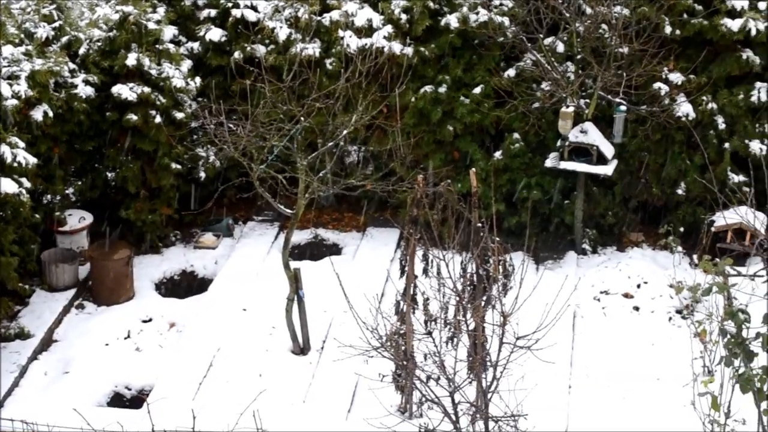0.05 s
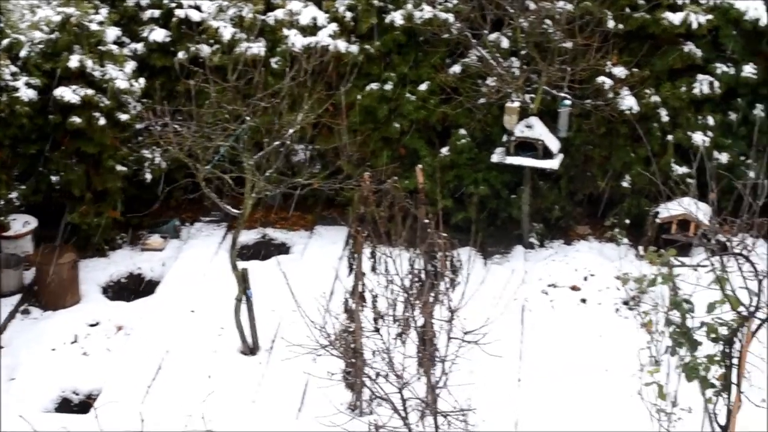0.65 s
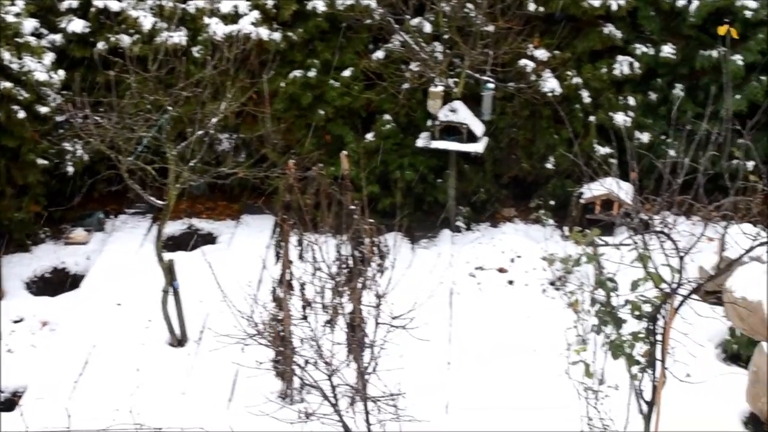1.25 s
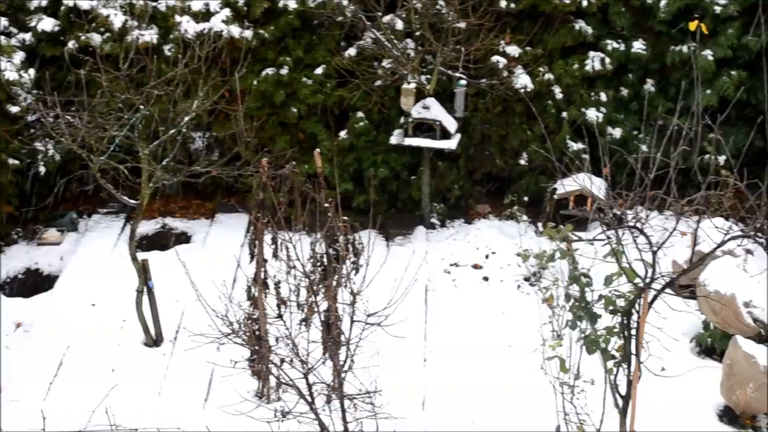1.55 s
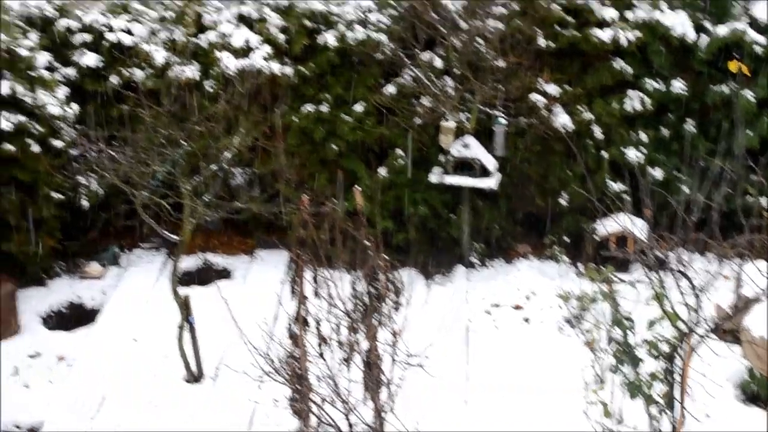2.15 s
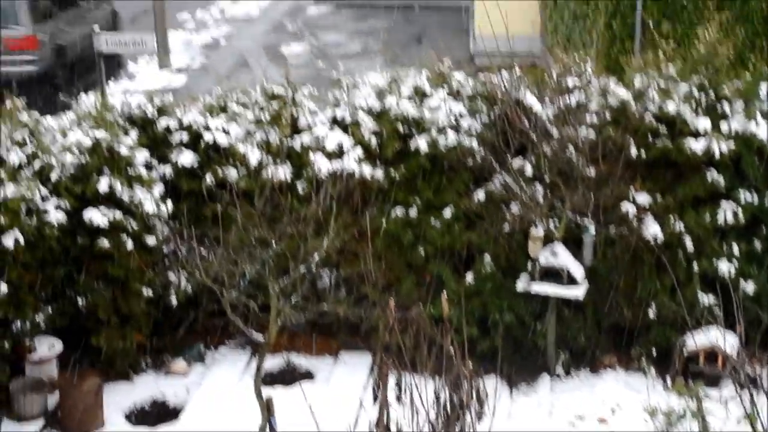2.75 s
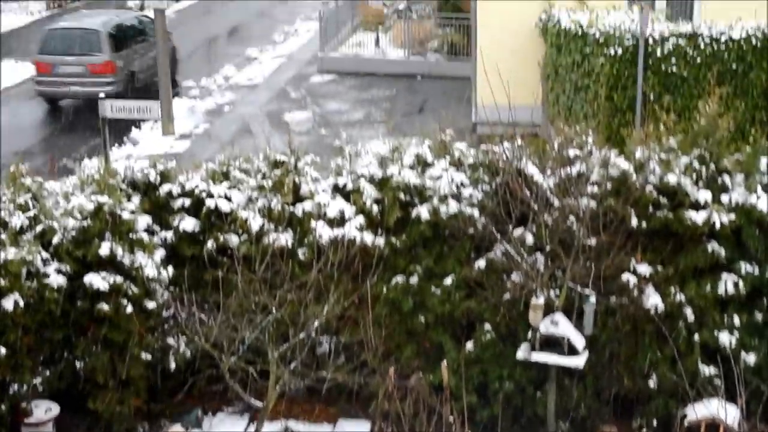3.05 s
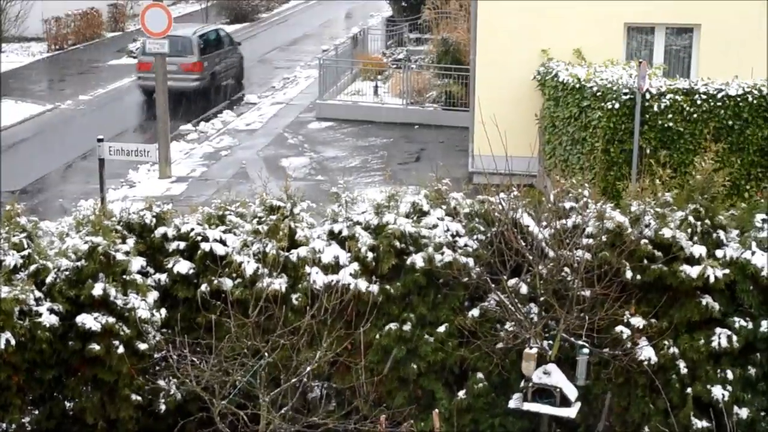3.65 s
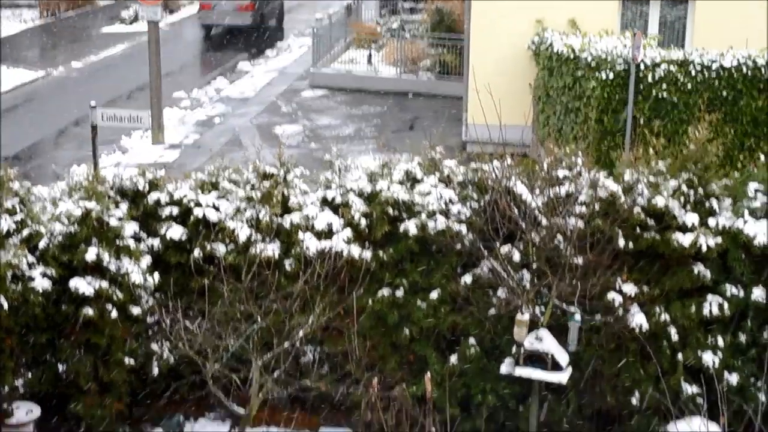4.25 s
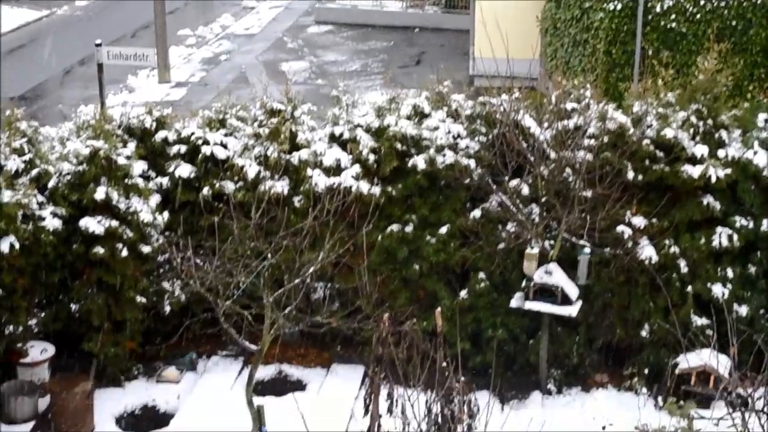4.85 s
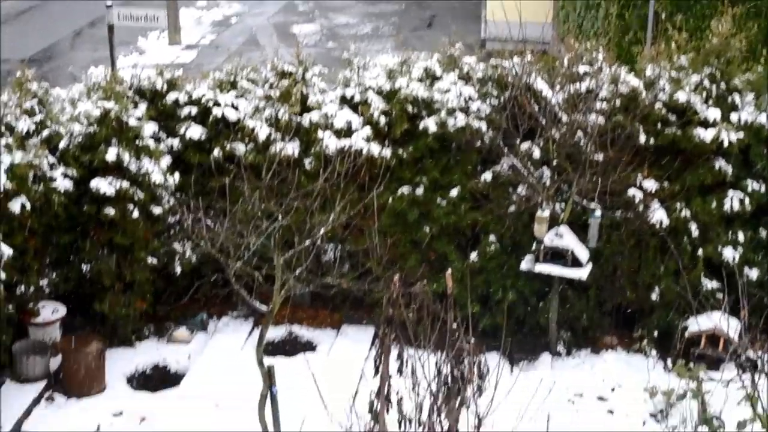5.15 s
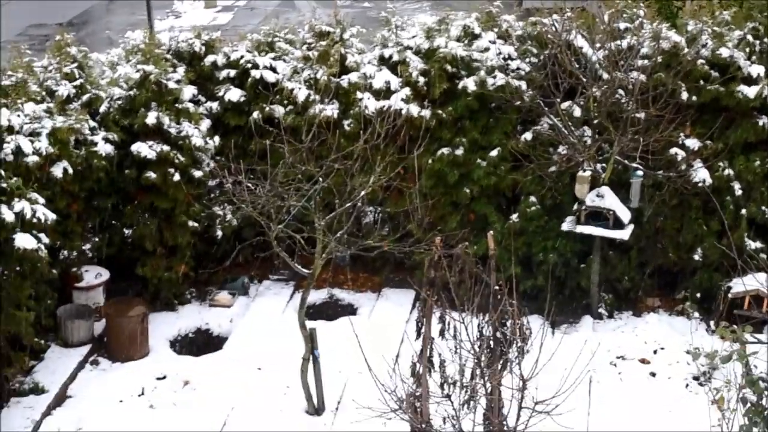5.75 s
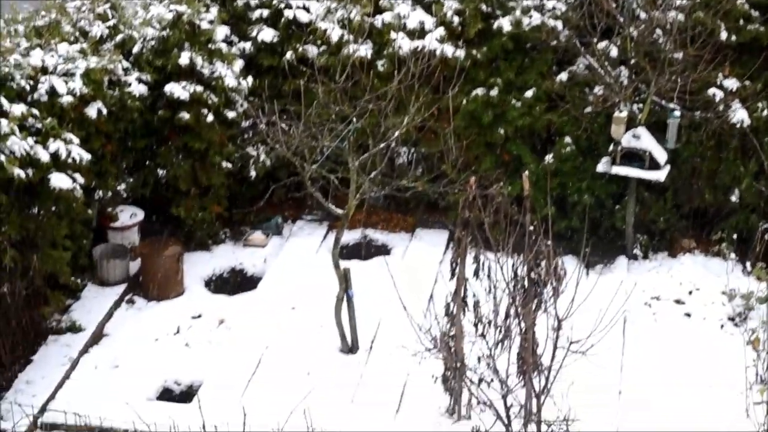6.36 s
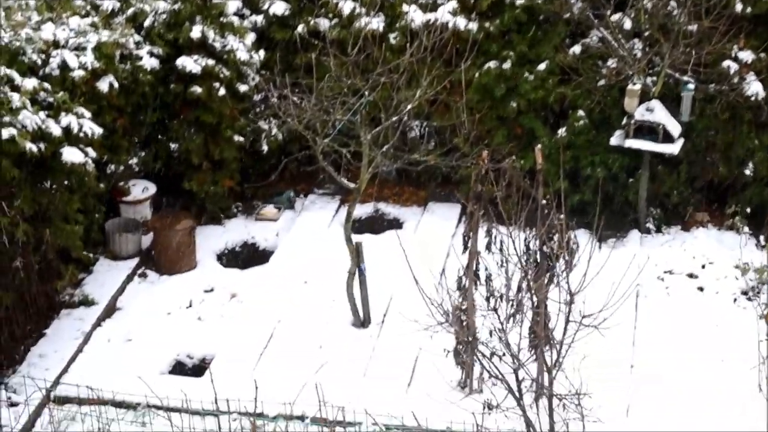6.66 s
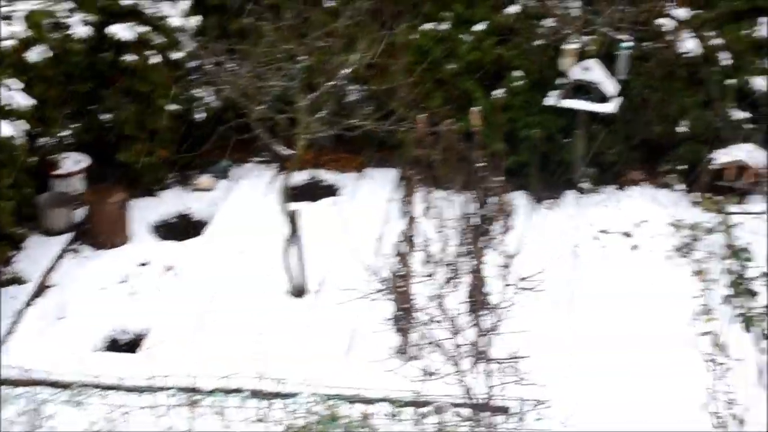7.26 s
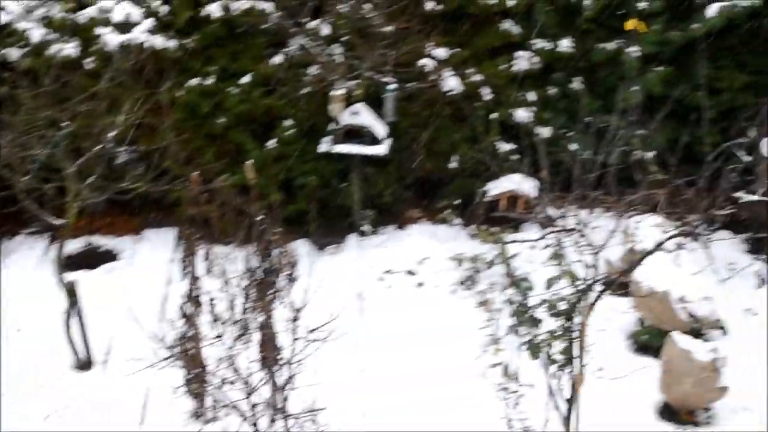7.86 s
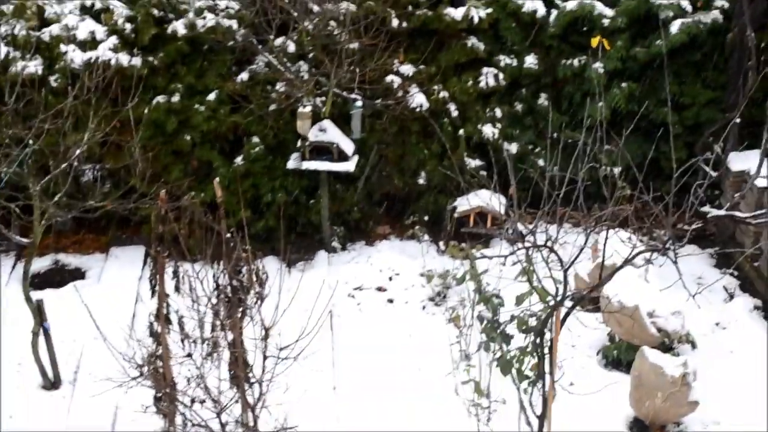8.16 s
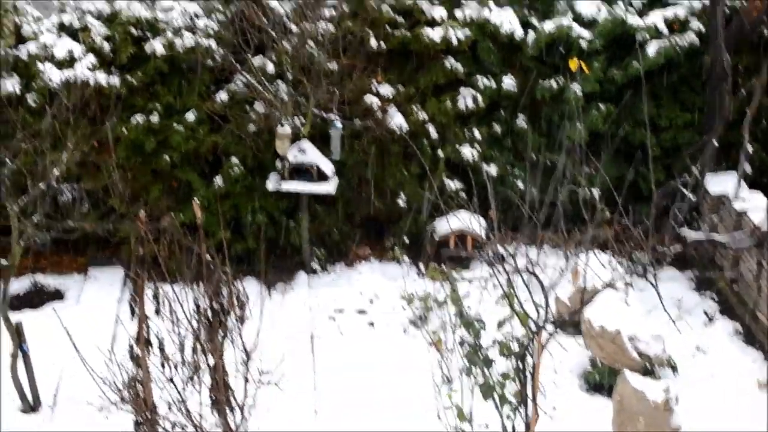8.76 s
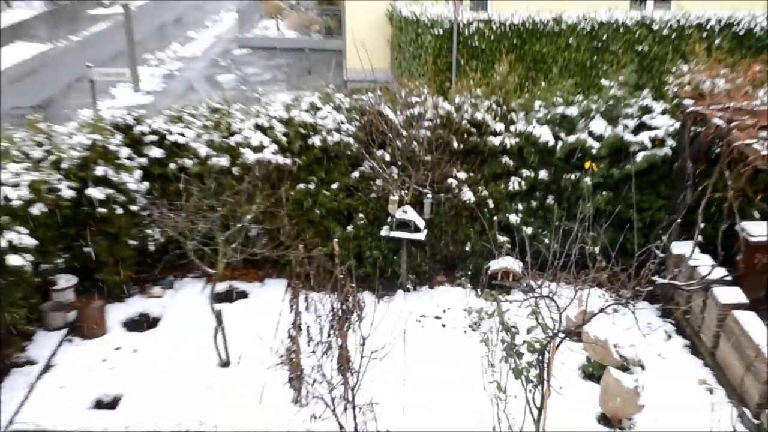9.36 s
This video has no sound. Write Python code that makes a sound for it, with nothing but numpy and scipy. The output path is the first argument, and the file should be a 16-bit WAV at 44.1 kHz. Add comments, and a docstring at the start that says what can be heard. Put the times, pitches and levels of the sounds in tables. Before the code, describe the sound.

Wet tyre hiss swells and slowly fades as a car drives by outdoors through slush, its engine humming quietly underneath.

```python
"""A car passing on a slushy street

A car drives past a snowy garden, changes up a gear and rolls away behind a house. Its tyres roar
and ring on the wet road, throw hissing spray and now and then splat through slush. Under them
hums a soft four-cylinder engine, whose notes follow how fast it fires. Far traffic murmurs, and
near the end a drop of meltwater taps close to the one microphone above the hedge."""
import sys
import numpy as np
from scipy import signal
from scipy.fft import rfft, irfft
from scipy.io import wavfile
from scipy.ndimage import uniform_filter1d

SR = 44100
rng = np.random.default_rng(int(sys.argv[2]) if len(sys.argv) > 2 else 0)


def output_pcm(signal):
    """Save a mono or channel-first signal as 16-bit PCM at the path in sys.argv[1].

    Samples are clipped to [-1, 1] before scaling.
    """
    pcm = np.clip(np.atleast_2d(signal).T, -1, 1) * 32767
    wavfile.write(sys.argv[1], SR, np.round(pcm).astype(np.int16))


N = 418950   # 9.5 seconds
TIME = np.arange(N) / SR
FREQS = np.maximum(np.arange(N // 2 + 1) * SR / N, 1)


def from_db(db):
    """Turn decibels into a number to multiply a sound by."""
    return 10 ** (np.asarray(db) / 20)


def rms_one(x):
    """Scale a sound so that its average level (rms) is 1."""
    return x / np.sqrt(np.mean(x ** 2) + 1e-20)


def evened(x):
    """Hold the level near 1 over each quarter second, keeping the fast grain."""
    power = np.maximum(uniform_filter1d(x * x, SR // 4), 0)
    return x / np.sqrt(power + 1e-20)


def in_time(rows):
    """Join rows that start with a time into one curve for each further column."""
    times_s, *columns = np.transpose(rows)
    return [np.interp(TIME, times_s, column) for column in columns]


def hump(peak_s, half_length_s):
    """A smooth rise and fall in time, 1 at its top."""
    return np.exp(-.5 * ((TIME - peak_s) / half_length_s) ** 2)


def bell(hz, centre_hz, width_hz):
    """The shape of a resonance: 1 at its centre, less to either side."""
    return 1 / (1 + (2 * (hz - centre_hz) / width_hz) ** 2)


def colour(points):
    """Join a few (pitch_hz, relative_db) points into a gain for every frequency."""
    hz, db = np.transpose(points)
    return from_db(np.interp(np.log(FREQS), np.log(hz), db))


def band(low_hz, high_hz, order=32):
    """Gains that keep what lies between two pitches; a higher order makes steeper edges."""
    return 1 / ((1 + (low_hz / FREQS) ** order) * (1 + (FREQS / high_hz) ** order))


def filtered(x, gain):
    """Turn each frequency of a sound up or down by its gain."""
    return irfft(rfft(x) * gain, N)


def noise(gain):
    """Steady noise of a given colour, at level 1."""
    spectrum = rng.standard_normal(len(FREQS)) + 1j * rng.standard_normal(len(FREQS))
    return rms_one(irfft(gain * spectrum, N))


def drift(rate_hz):
    """A smooth random wander, about 1 in size; a higher rate wanders faster."""
    step, settle = 40, 2000   # one value every 40 samples; the first 2000 values are skipped
    pole = np.exp(-2 * np.pi * rate_hz * step / SR)
    jitter = rng.standard_normal(N // step + settle + 2)
    slow = signal.lfilter([1], [1, -2 * pole, pole * pole], jitter)[settle:]
    return np.interp(np.arange(N) / step, np.arange(len(slow)), rms_one(slow))


def swelling(x, rows):
    """Make bands of a sound swell or sink for a while, each around its own moment."""
    out, spectrum = x.copy(), rfft(x)
    for peak_s, half_length_s, pitch_hz, width_hz, change_db in rows:
        part = irfft(spectrum * bell(FREQS, pitch_hz, width_hz), N)
        out += (from_db(change_db * hump(peak_s, half_length_s)) - 1) * part
    return out


def doublings(nearest_s, speed_m_per_s=9.85, road_distance_m=9.92):
    """How many doublings farther away the car is than at its nearest point."""
    along_road_m = speed_m_per_s * (TIME - nearest_s)
    return np.log2(np.hypot(1, along_road_m / road_distance_m))


# The colours of the town's rumble and of tyres far away: pitch_hz, relative_db
TOWN_COLOUR = [(25, -24), (50, -10), (85, -8), (140, 0), (200, 0), (300, -4), (600, -9), (2000, -52)]
FAR_TYRE_COLOUR = [(210, -45), (350, -7), (397, -4), (433, 4), (503, -9), (529, -10), (800, 1.5),
                   (1030, -2), (1360, 0.5), (1660, 2), (2080, -1), (2320, -1), (2770, -1.5), (4570, -2.5),
                   (7000, -12.5), (9100, -13), (15400, -120)]

def town(rumble_db=-66.0, hiss_db=-56.5):
    """Far traffic on wet roads leaves a faint rumble and hiss."""
    rumble = noise(colour(TOWN_COLOUR))
    hiss = noise(colour(FAR_TYRE_COLOUR) * band(2600, 7000, order=8))
    return from_db(rumble_db) * rumble + from_db(hiss_db) * hiss


# The notes in the drop's tap, each dying by 60 dB in its ring time: pitch_hz, relative_db, ring_s
DRIP_NOTES = [(660, -33, .03), (800, -37, 0.023), (1080, -34, 0.018), (1400, -45, 0.011)]

def drip(start_s=8.8205, gain_db=-0.5, low_cut_hz=520):
    """A drop of meltwater lands with a hollow tap; neighbouring notes swing in opposite directions."""
    age = np.clip(TIME - start_s, 0, .5)
    tap = 0
    for k, (pitch_hz, relative_db, ring_s) in enumerate(DRIP_NOTES):
        level = from_db(relative_db + gain_db - 60 * age / ring_s)
        tap += (-1) ** k * level * np.sin(2 * np.pi * pitch_hz * age)
    return signal.sosfilt(signal.butter(2, low_cut_hz, "high", fs=SR, output="sos"), tap)


# Hums set off by bumps: peak_s, half_length_s, pitch_hz, level_db
BUMP_HUMS = [(.55, 0.098, 177.4, -56), (1.05, 0.11, 175, -55), (3.488, 0.095, 174, -59.5),
             (3.843, 0.049, 170, -64), (4.07, 0.051, 173, -63), (8.57, 0.06, 172, -68),
             (8.97, .09, 173, -67)]

def tyre_air(wobble=0.016, rough_db=3.0):
    """The ring of air inside the tyres hums unsteadily after a bump."""
    flutter = from_db(rough_db * drift(16))
    wavering_time = np.cumsum(1 + wobble * drift(5.0)) / SR
    hums = sum(from_db(level_db) * hump(peak_s, half_s) * np.sin(2 * np.pi * pitch_hz * wavering_time)
               for peak_s, half_s, pitch_hz, level_db in BUMP_HUMS)
    return np.sqrt(2) * flutter * hums


# How hard the engine works: time_s, load_db
ENGINE_LOAD = [(0, 2.5), (.8, 4.5), (1.2, 10), (1.45, 6.5), (1.72, 7), (1.82, -0.5), (2.25, -3.5),
               (2.42, 5), (2.93, 3.5), (3.06, -6), (3.3, -11), (3.6, -11.5), (4.25, -11), (4.8, -4),
               (5.5, -1), (6.05, -11), (6.45, 1), (7.85, 4.5), (8.05, -7), (8.5, -2), (9.5, -5)]

def under_load(nearest_s, level_db, loss_db, load_share):
    """An engine sound's level in dB: it follows the load and drops by loss_db as distance doubles."""
    load_db, = in_time(ENGINE_LOAD)
    return level_db - loss_db * doublings(nearest_s) + load_share * load_db


# The engine pulls in a low gear, changes up after three seconds, then eases off: time_s, firing_hz
FIRING_RATE = [(0, 66.5), (.35, 63), (.69, 60.4), (.91, 61.4), (1.2, 61.7), (1.4, 63.5), (1.7, 66.8),
               (2.13, 70.8), (2.4, 73.8), (2.65, 77.2), (2.9, 79), (3.05, 77.3), (3.2, 73), (3.35, 61),
               (3.6, 48), (4.8, 51), (5.5, 51.5), (6.7, 49.7), (7.2, 48), (8.4, 44.3), (9.5, 44.3)]
# Notes at 1 to 5 times the firing rate, a belt-driven part, and the growl of uneven burning:
# nearest_s, level_db, loss_db, load_share
ENGINE_NOTES = [(1.7, -60, 8.7, 0.17), (2.87, -58.5, 7.6, .9), (2.77, -53.7, 13.5, 1.1),
                (1.96, -61.5, 6.2, 0.75), (2.1, -59, 10, 0.48)]
BELT_NOTE = (3, -59, 32, 1)
GROWL_LEVEL = (0.5, -57, 8.5, 1.1)
# Single notes fade or swell as the car goes by: peak_s, half_length_s, firing_multiple, change_db
NOTE_SWELLS = [(1.45, .24, 1, -12), (2.85, .11, 1, -9), (3.22, .12, 1, 6), (8.4, .5, 1, 3),
               (1.1, .3, 2, -8), (6.6, .25, 4, 4.5)]
# The colour of the growl: pitch_hz, relative_db
GROWL_COLOUR = [(30, -42), (70, 2), (105, -12), (135, -9), (180, 13), (250, 4.5), (290, 5.5), (340, -14),
                (420, -31), (1200, -75)]

def engine(wobble=0.0014, rough_db=0.4, belt_multiple=2.26, boom_db=8, throb_hz=2.77, throb_s=5.0):
    """The firings make notes that boom at the exhaust's resonance; uneven burning adds a growl."""
    firing_hz, = in_time(FIRING_RATE)
    phase = 2 * np.pi * np.cumsum(firing_hz * (1 + wobble * drift(4.54))) / SR
    throb = 0.81 * hump(throb_s, 0.7) * np.cos(2 * np.pi * throb_hz * (TIME - throb_s))
    hum = 0
    for multiple, note in [*enumerate(ENGINE_NOTES, 1), (belt_multiple, BELT_NOTE)]:
        exhaust_db = boom_db * bell(multiple * firing_hz, centre_hz=187, width_hz=28)
        level_db = under_load(*note) + exhaust_db + rough_db * drift(7.5)
        if multiple == 1:   # the lowest note throbs as the new gear takes up
            level_db += 20 * np.log10(1 + throb)
        level_db += sum(change_db * hump(peak_s, half_s)
                        for peak_s, half_s, which, change_db in NOTE_SWELLS if which == multiple)
        hum += from_db(level_db) * np.sin(multiple * phase + rng.uniform(0, 2 * np.pi))
    # Labouring at low revs: a side note beats against the fourth note once every four firings.
    load_db, = in_time(ENGINE_LOAD)
    hum += from_db(load_db - 70) * hump(peak_s=7.5, half_length_s=.55) * np.sin(3.75 * phase)
    growl = from_db(under_load(*GROWL_LEVEL)) * noise(colour(GROWL_COLOUR))
    return np.sqrt(2) * hum + growl


# The tyres hit lumps of slush: start_s, relative_db, decay_s
SLUSH_HITS = [(1.408, -32, 0.0088), (2.241, -26, 0.0087), (2.272, -24.5, 0.031), (2.575, -23.5, 0.005),
              (3.14, -37, 0.036), (3.932, -31, .006), (4.071, -30, 0.011), (4.745, -38, .007),
              (6.27, -37, 0.11), (7.4, -39, .45), (7.629, -35.5, 0.011), (9.06, -40, .09)]
# The colour of a splat: pitch_hz, relative_db
SLUSH_COLOUR = [(150, -45), (400, -15), (900, -4), (1800, 5.5), (2600, 0.5), (4000, -9), (9000, -34),
                (11500, -55)]

def slush(gain_db=-2.0, rise_share=0.23):
    """Lumps of slush burst under a tyre in puffs of noise; the longer the puff, the softer its start."""
    bursts = np.zeros(N)
    for start_s, relative_db, decay_s in SLUSH_HITS:
        progress = np.maximum(TIME - start_s, 0) / decay_s
        rise = 1 - np.exp(-progress / rise_share)
        bursts += from_db(relative_db + gain_db) * rise * np.exp(-progress)
    return bursts * noise(colour(SLUSH_COLOUR))


def street_echoes(x, count=16, strength=.046):
    """Faint echoes off kerb, hedge and walls slide and flicker, so the hiss ripples as the car moves."""
    out, farness = x.copy(), doublings(nearest_s=1.84)
    for delay_ms, slide_ms in rng.uniform([1, -.4], [11, .4], (count, 2)):
        late_s = (delay_ms + slide_ms * farness) / 1000
        out += strength * drift(.7) * np.interp(TIME - late_s, TIME, x)
    return out


# Echoes off nearby surfaces shift as car and microphone turn. One list a path: time_s, delay_ms, gain
ECHO_PATHS = [
    [(0, 1.43, 0.12), (.8, 0.82, 0.056), (1.3, 1, 0.063), (1.8, 0.97, 0.12), (2.4, 1.03, 0.061),
     (2.7, 1.4, .03), (3.2, 0.91, 0.081), (4.6, 1.4, 0.037), (5.7, 1.32, 0.13), (7.2, 1.28, 0.23),
     (8.0, 1.14, 0.022), (9.5, 1.4, 0.028)],
    [(0, 2.6, .01), (1, 2.4, .05), (2.1, 2.22, 0.1), (3.5, 2.4, 0.062), (4.4, 1.6, .01)],
    [(0, 2.8, 0.0092), (1.1, 3.34, -0.23), (2, 2.83, -0.031), (3.1, 2.25, -0.002), (3.8, 2.8, 0.014)],
]

def near_echoes(x):
    """Very short echoes lift some pitches and weaken others, in wide ridges that slide up and down."""
    out = x.copy()
    for path in ECHO_PATHS:
        delay_ms, gain = in_time(path)
        out += gain * np.interp(TIME - delay_ms / 1000, TIME, x)
    return out


# The colour of the tyres from the car's front, side and rear: pitch_hz, relative_db
FRONT_COLOUR = [(210, -43), (350, -13), (402, -13), (523, -4), (639, -6.5), (831, -1), (1320, -9),
                (1460, -6.5), (1700, -8.5), (2290, -12), (2600, -11.5), (3060, -15.5), (3450, -14),
                (3860, -14), (7000, -16.5), (9100, -64), (15400, -120)]
SIDE_COLOUR = [(210, -37), (350, 3), (407, -19), (550, 1.5), (663, -8.5), (885, 1.5), (1140, 0), (1410, -2),
               (1540, -5.5), (1720, -4), (2500, -8.5), (2800, -8), (3470, -6.5), (4990, -7.5),
               (7000, -11.5), (9100, -8), (15400, -120)]
REAR_COLOUR = [(210, -39), (350, 9), (412, -27), (536, -6), (600, -6.5), (663, -14), (733, -6), (821, -3),
               (1200, -5), (1590, -3.5), (1970, -10.5), (2410, -6), (3510, -6.5), (3840, -6), (7000, -14),
               (9100, -3), (15400, -120)]
# When each is heard: front_until_s, side_from_s, side_until_s, rear_from_s, rear_until_s, far_from_s
FACING_TIMES = [.7, 1.9, 2.9, 3.6, 5.9, 7.2]

def tyre_noise():
    """Each side of the car has its own colour of noise; they fade into each other as it goes by."""
    facing = np.interp(TIME, FACING_TIMES, [0, 1, 1, 2, 2, 3])
    out = 0
    for k, side in enumerate([FRONT_COLOUR, SIDE_COLOUR, REAR_COLOUR, FAR_TYRE_COLOUR]):
        share = np.maximum(1 - np.abs(facing - k), 0)
        out += np.sqrt(share) * noise(colour(side))
    return out


# Water lying on the road under the wheels: time_s, wetness_db
ROAD_WETNESS = [(0.0, -0.3), (0.5, 0.4), (0.99, 1.5), (1.94, -0.5), (2.15, -3), (2.33, -1), (2.5, -0.6),
                (2.7, -1), (3.17, -.5), (3.28, -1), (3.42, -1), (4.27, 1.4), (4.6, -0.5), (5.25, 2.5),
                (5.65, 3), (6.32, 1.5), (6.6, 0.6), (6.89, 2.1), (7.08, 0.5), (7.67, 1), (7.82, 1),
                (8.38, -0.25), (9.5, -5)]

def passing(nearest_s, level_db, coming_db, going_db, wet_share, house_loss_db, puddle_lift_db):
    """A tyre sound's level in dB: each doubling of distance costs coming_db before, going_db after."""
    house_s, house_fade_s = 5.45, 0.45   # the car slips behind a house
    puddle_s, rise_s, decay_s = 8.972, .035, 1.0   # and later runs through a puddle
    wetness_db, = in_time(ROAD_WETNESS)
    loss_db = np.where(TIME < nearest_s, coming_db, going_db) * doublings(nearest_s)
    hidden = np.clip((TIME - house_s) / house_fade_s, 0, 1)
    age = np.maximum(TIME - puddle_s, 0)
    puddle = np.minimum(age / rise_s, np.exp((rise_s - age) / decay_s))
    return level_db - loss_db + wet_share * wetness_db - house_loss_db * hidden + puddle_lift_db * puddle


def droplets(gain, per_s, spread_db):
    """Countless tiny drops of uneven size land at random moments; the patter has level 1."""
    sizes = from_db(spread_db * np.minimum(rng.exponential(1, N), 4))
    signs = rng.choice([-1, 1], N)
    lands = rng.random(N) < per_s / SR
    return rms_one(filtered(sizes * signs * lands, gain))


def in_sheets(x, waver_db=0.75, rate_hz=3.6, bands=9):
    """The spray comes in sheets, so each band of the hiss wavers on its own."""
    out, spectrum = x.copy(), rfft(x)
    edges_hz = np.geomspace(3000, 11000, bands + 1)
    for low_hz, high_hz in zip(edges_hz, edges_hz[1:]):
        part = irfft(spectrum * band(low_hz, high_hz), N)
        out += (from_db(waver_db * drift(rate_hz)) - 1) * part
    return out


# The colour of the fine mist: pitch_hz, relative_db
MIST_COLOUR = [(6500, 2), (7400, 0), (8600, -.7), (9300, -1.5), (10000, -5.8), (10700, -14.5), (11300, -27),
               (11700, -42), (12200, -70)]
# How the coarse spray and the mist carry to the garden:
# nearest_s, level_db, coming_db, going_db, wet_share, house_loss_db, puddle_lift_db
COARSE_PASS = (2.5, -33.5, 16, 5.5, 1.38, 1.33, 1.5)
MIST_PASS = (2.5, -41.5, 12, 7, 1.5, 5, 11.5)

def spray(tyres, water, drops_db=-10.0, fine_drops_db=-6.0, uneven_db=0.55):
    """Water flung from the tread hisses and patters on the wheel arches and the road."""
    coarse_band = band(3253, 7440)
    hiss = evened(filtered(tyres, coarse_band))
    hiss += from_db(drops_db) * droplets(coarse_band * colour(REAR_COLOUR), per_s=1000, spread_db=4.5)
    fine_band = np.sqrt(band(7200, 13000)) * colour(MIST_COLOUR)
    mist = noise(fine_band) + from_db(fine_drops_db) * droplets(fine_band, per_s=2200, spread_db=5.5)
    heard = from_db(passing(*COARSE_PASS)) * hiss + from_db(passing(*MIST_PASS)) * street_echoes(mist)
    flicker = from_db(uneven_db * (water + 0.3 * drift(22)))
    return in_sheets(heard * flicker)


# The tyre body drones lower ahead of the car and far off, higher just behind it: pitch_hz, relative_db
LOW_DRONE = [(30, -38), (100, -25), (150, -6.5), (220, -6), (275, 1.5), (325, -1), (385, -7), (470, -1),
             (540, -30), (900, -75)]
HIGH_DRONE = [(30, -40), (100, -17.5), (200, -8), (260, -4.5), (315, 3), (360, -2), (420, -17), (470, -5),
              (540, -56), (900, -75)]
# When the higher drone is heard: start_s, full_from_s, full_until_s, gone_s
HIGH_DRONE_TIMES = [2.2, 3.3, 6.3, 7.8]
# The drone swells and sinks; near the end a narrow engine note stands out:
# peak_s, half_length_s, pitch_hz, width_hz, change_db
DRONE_SWELLS = [(.15, .4, 330, 170, -3), (1.1, 0.053, 280, 150, 9), (1.65, 0.087, 256, 60, 7.5),
                (2.0, .12, 297, 67, 7.5), (2.4, 0.037, 280, 60, 9), (3.7, .12, 150, 280, -8),
                (4.75, 0.07, 307, 40, 6), (5.9, .45, 186, 110, -6), (9.3, .35, 228, 14, 9)]
# How the tyre's body, tread and grooves carry to the garden:
# nearest_s, level_db, coming_db, going_db, wet_share, house_loss_db, puddle_lift_db
BODY_PASS = (2.5, -45.5, 8.5, 6.5, 0.27, 3, 4)
TREAD_PASS = (1.84, -37.5, 12.5, 5.5, 0.34, -0.5, 1.5)
GROOVE_PASS = (2, -33.5, 13, 3, 0.9, 3, 2.5)

def rolling(tyres, water, uneven_db=0.28):
    """The tyre's body rumbles; its tread blocks slap the road and pump water out of the grooves."""
    behind = np.interp(TIME, HIGH_DRONE_TIMES, [0, 1, 1, 0])
    drone = np.sqrt(1 - behind) * noise(colour(LOW_DRONE)) + np.sqrt(behind) * noise(colour(HIGH_DRONE))
    rumble = from_db(passing(*BODY_PASS)) * swelling(evened(drone), DRONE_SWELLS)
    roar = from_db(passing(*TREAD_PASS)) * evened(filtered(tyres, band(471, 1293)))
    squeeze = from_db(passing(*GROOVE_PASS)) * evened(filtered(tyres, band(1305, 3227)))
    return rumble + (roar + squeeze) * from_db(uneven_db * water)


# Brief lifts and dips in the tyre sound: peak_s, half_length_s, pitch_hz, width_hz, change_db
HISS_RINGS = [(.5, .13, 1480, 60, 6), (.47, .1, 2580, 70, 9), (.67, .06, 2430, 60, 14),
              (1.1, .4, 2590, 100, 7.5), (.85, .3, 3460, 160, 6), (.88, .09, 825, 90, 4),
              (1.55, .3, 1130, 200, 5), (1.9, .2, 1290, 140, 5), (1.75, .25, 2060, 120, 3.5),
              (2.05, 0.14, 900, 110, 3.5), (2.4, 0.17, 1030, 120, 2.5), (2.3, 0.052, 2800, 55, 5),
              (2.53, .04, 1000, 300, 4), (2.7, .3, 780, 140, 2.5), (2.88, .1, 1440, 150, 5.5),
              (3.1, 0.2, 3900, 130, 4), (3.95, 0.37, 1550, 180, 1), (5.0, .4, 830, 220, 3),
              (5.05, .33, 1650, 200, 6), (5.1, .4, 4480, 240, 4), (5.42, .23, 2390, 160, 8),
              (5.4, .28, 2960, 260, 3.5), (7.25, 0.23, 4470, 150, 3), (7.35, 0.12, 1460, 134, 4.5),
              (7.9, 0.6, 2370, 150, 4), (8.2, 0.13, 1350, 110, 5), (9.2, 0.25, 2520, 420, 5)]   # narrow bands ring out as nearby echoes reinforce them
ROAD_ECHO_DIPS = [(2.35, 0.22, 3470, 200, -9), (3.3, 0.74, 1270, 130, -9), (3.7, .35, 550, 110, -4),
                  (5.9, 0.71, 2620, 150, -6), (6.1, .3, 1390, 201, -3)]   # the echo off the road cancels narrow bands
HISS_SWISHES = [(1.8, 0.13, 2000, 1270, -1.5), (2.68, 0.036, 5130, 800, 6), (2.95, 0.14, 2360, 1190, 3),
                (3.07, 0.043, 9000, 4000, -2.5), (3.16, .035, 3600, 1400, 0.5),
                (3.28, 0.036, 2800, 1500, -2.5), (3.349, 0.07, 6650, 2680, 3), (3.46, 0.059, 3300, 1400, 3),
                (3.6, 0.51, 9800, 2000, -2.5), (3.95, 0.32, 2060, 1400, 2), (4.0, 0.28, 7200, 2500, -3),
                (4.6, 0.24, 5440, 2470, -5), (4.85, 0.12, 8500, 3480, -1.5), (5.05, 0.065, 6330, 2200, -3),
                (5.33, 0.048, 9000, 900, 4), (5.45, 0.078, 6140, 1200, -1.5), (5.499, 0.17, 2600, 1980, -2),
                (5.83, .13, 5400, 1400, 2.5), (5.78, .07, 9000, 4000, 3), (6.08, 0.12, 8200, 3500, -3),
                (6.55, 0.28, 3130, 1000, -2), (6.9, 0.31, 1960, 1490, -2.5), (7.0, .3, 7800, 1510, 1.5),
                (7.33, 0.073, 8500, 3000, 3), (7.858, 0.07, 8500, 5000, -3), (8.2, 0.56, 10400, 1800, -3),
                (8.6, 0.17, 3220, 980, 4), (9.03, .14, 7500, 1300, -3), (9.27, .14, 9300, 1400, 3)]   # wide bands brighten or dull as the car moves off

def wheels():
    """The tyres roll and throw spray; the uneven film of water stirs both sounds together."""
    tyres = swelling(tyre_noise(), [*HISS_RINGS, *ROAD_ECHO_DIPS])
    tyres = near_echoes(street_echoes(tyres))
    water = drift(rate_hz=6.1)
    return swelling(rolling(tyres, water) + spray(tyres, water), HISS_SWISHES)


def scene():
    """The car, the far town and the drip add up to one sound, the same in both channels."""
    street = wheels() + tyre_air() + slush() + engine() + town() + drip()
    return np.stack([street, street])


def record(dry, notch_hz=7920, notch_width_hz=380, notch_db=-7.0, cutoff_hz=11660):
    """The microphone's opening cuts a narrow notch in the treble; the very top is cut off."""
    notch = from_db(notch_db * bell(FREQS, notch_hz, notch_width_hz))
    top_cut = 1 / np.sqrt(1 + (FREQS / cutoff_hz) ** 200)
    return filtered(dry, notch * top_cut)


dry = scene()
out = record(dry)
output_pcm(out)
```